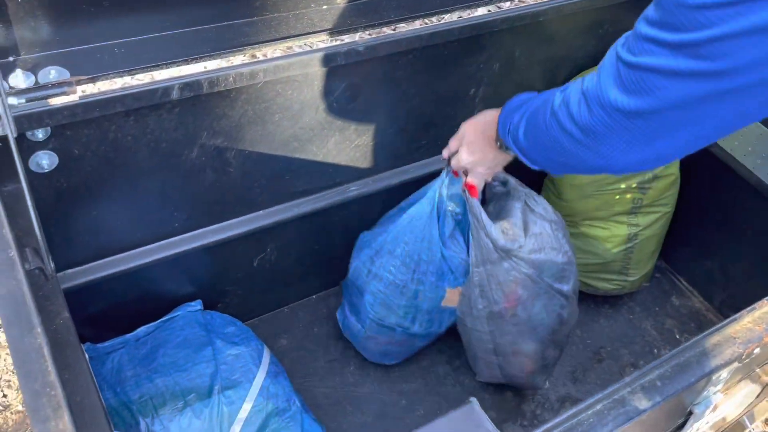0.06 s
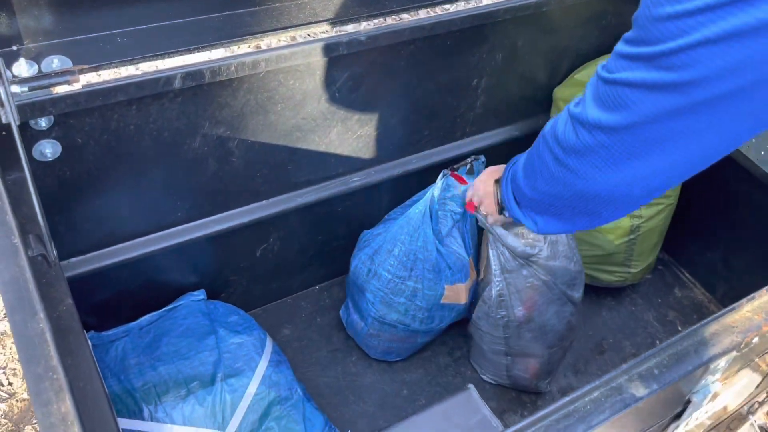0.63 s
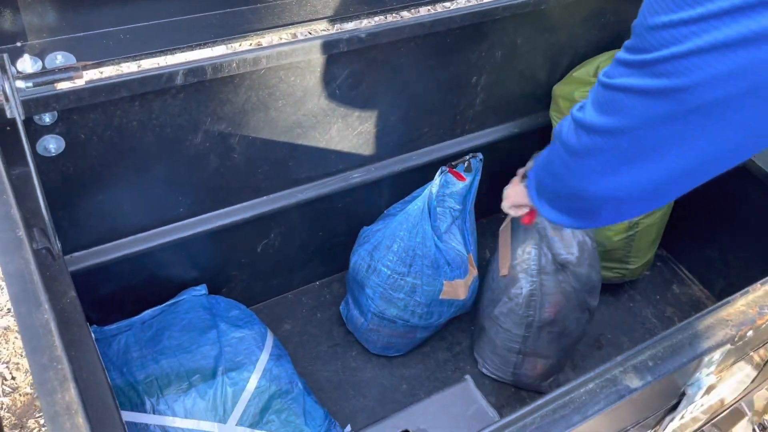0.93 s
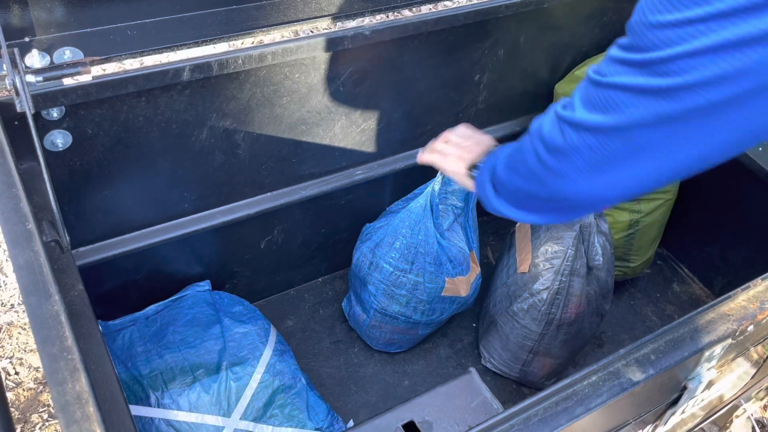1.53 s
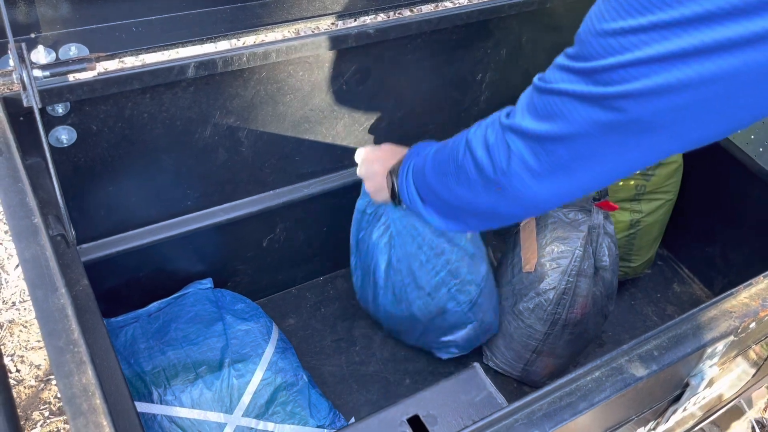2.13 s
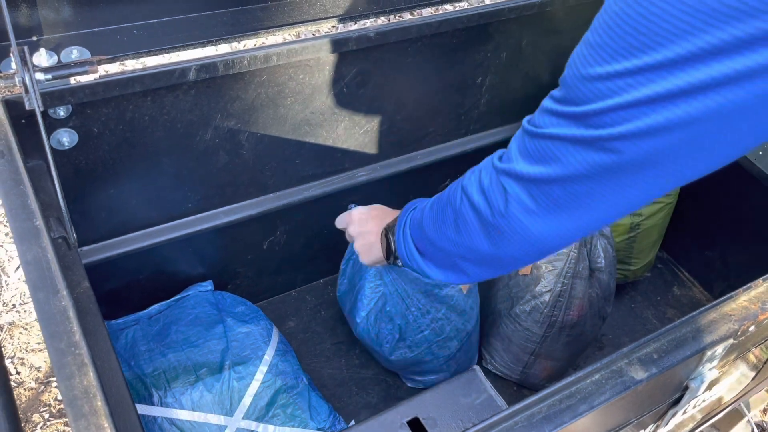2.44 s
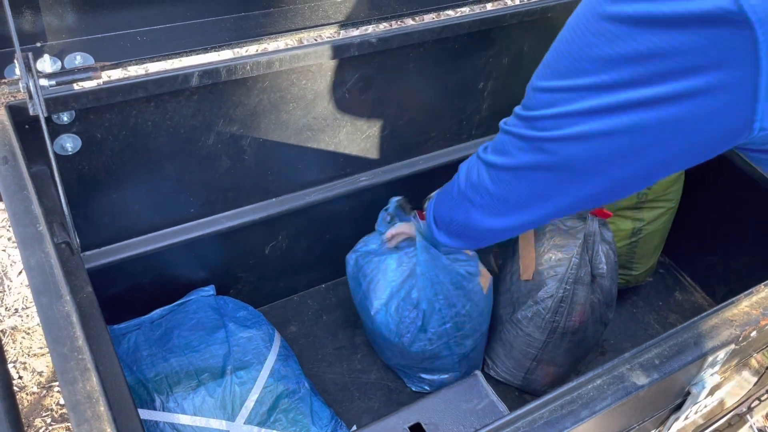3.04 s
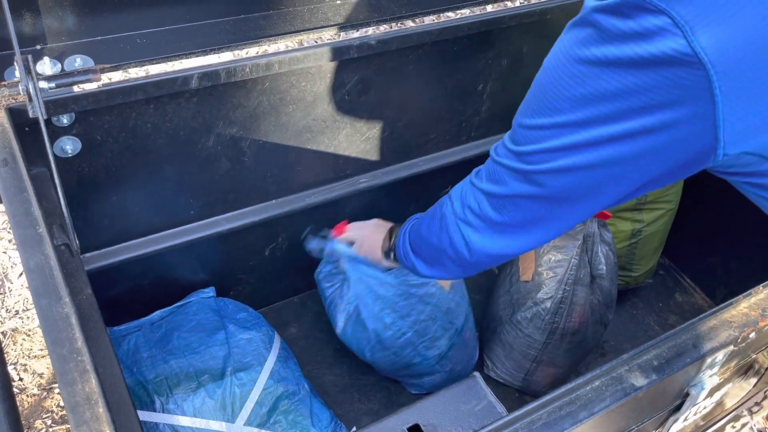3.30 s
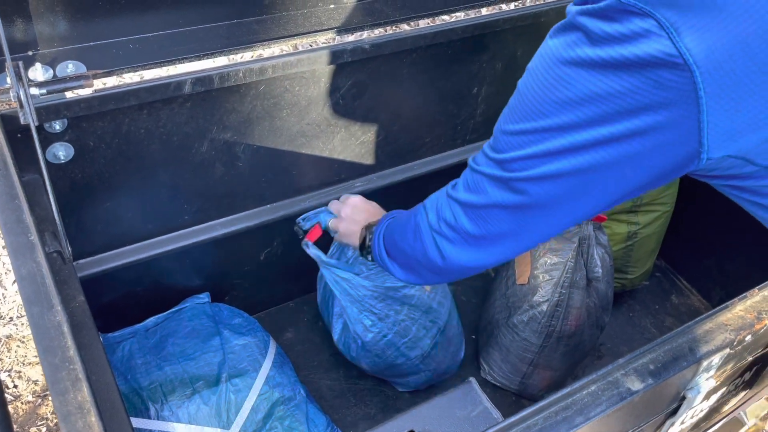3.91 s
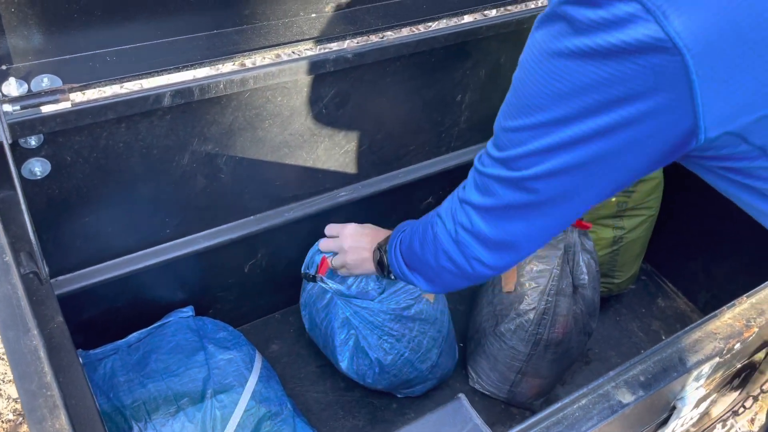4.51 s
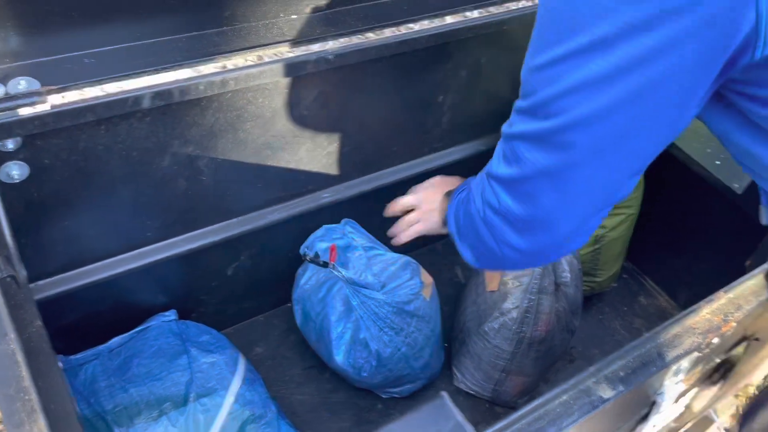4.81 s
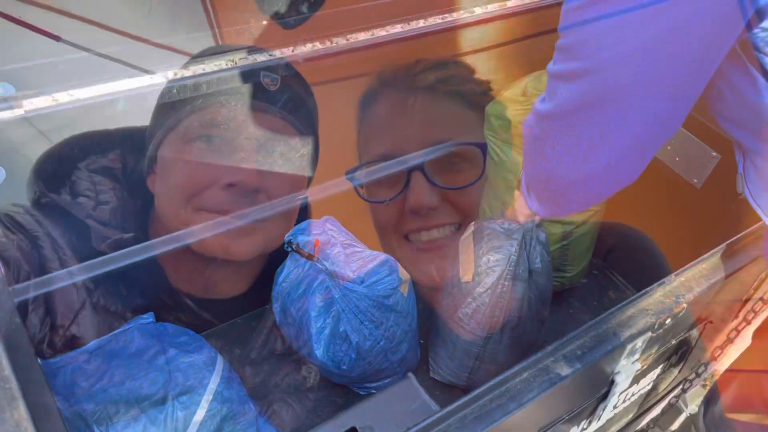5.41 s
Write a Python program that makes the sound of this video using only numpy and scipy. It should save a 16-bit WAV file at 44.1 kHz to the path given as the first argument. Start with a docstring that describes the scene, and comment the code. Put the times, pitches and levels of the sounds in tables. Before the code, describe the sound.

A brief nylon rustle opens, and at about 0.1 seconds stuffed bags land in a steel storage box with a heavy thump. The panels ring low and fade within a second as the load settles. Uneven crinkling follows, with snapping creases, short scrapes and small ticks from the contents, easing off around 1.3 seconds. The rustling picks up near 1.7 seconds and surges at 2.1 as a bag is dragged. Around 3 seconds comes a louder cluster of crackles and muffled knocks. From 3.3 to 3.9 seconds the load bumps and slips on the floor, stirring the panels again, with more bumps and a scrape near 4.4. A soft thud lands at about 5 seconds, then a few light rustles continue until 5.5. Everything is close and in stereo, with tight reflections from the box and faint, low outdoor air underneath.

```python
"""A brief nylon rustle, then a heavy thump: stuffed bags land in a steel storage box and its panels ring.
The bags are shuffled about. Folds buckle and crinkle, creases snap, contents rub and tick, and the load
sticks, slips and bumps on the floor, stirring the panels again. Faint campsite air lies underneath.
A close pair of microphone ports hears it all with the box's reflections."""
import sys
import numpy as np
from scipy import signal
from scipy.fft import rfft, irfft, next_fast_len
from scipy.io import wavfile

SR = 44100
rng = np.random.default_rng(int(sys.argv[2]) if len(sys.argv) > 2 else 0)


def unload_wav(signal):
    """Save mono or channel-first audio to the path in sys.argv[1] as 16-bit WAV at rate SR, clipped to [-1, 1]."""
    wavfile.write(
        sys.argv[1],
        SR,
        np.round(np.clip(np.atleast_2d(signal).T, -1, 1) * 32767).astype(np.int16),
    )


N = 244755
TIME = np.arange(N) / SR

# pulls and pushes of the bags: (start [s], length [s], crinkle [dB], swell over the move [dB],
# sheen [dB re crinkle], rub [dB re crinkle], drag drive [dB re crinkle])
MOVES = [(-0.03, 0.14, -54, -3.5, 2, 5.5, 10), (0.078, 0.054, -34.5, 3.5, -4.5, -2, 18),
         (0.134, 0.071, -54, 4.5, -7, 8, 10), (0.202, 0.26, -50, -2.5, -2.5, 8, 0),
         (0.497, 0.15, -52, -2.5, -9, 6, 14), (0.627, 0.25, -54, 3.5, -3.5, 1, 7),
         (0.922, 0.1, -42, -6.5, -6, -0.5, 6.5), (1.028, 0.1, -50.5, -1, -7.5, -1.5, -2),
         (1.158, 0.28, -56.5, -4, -12, -5, -11), (1.576, 0.084, -49, -1.5, 0, -3.5, -3),
         (1.67, 0.15, -44.5, -2.5, -7, 0, 4.5), (1.869, 0.11, -59, 0, -2, -2, 12.5),
         (1.999, 0.092, -45, -1, -0.5, -3.5, -12), (2.105, 0.052, -33.5, -4.5, 3, -0.5, -13),
         (2.151, 0.22, -40.5, -4, -3.5, 2, 11), (2.411, 0.48, -54.5, -5, -4.5, 1.5, 7),
         (2.703, 0.2, -48.5, -5.5, 1, -0.5, 11.5), (2.889, 0.042, -34.5, -4.5, -2, -4.5, 3),
         (2.949, 0.083, -37.5, 4, -9.5, 1, -6), (3.035, 0.24, -41.5, 0.5, -8, -1, -20),
         (3.294, 0.098, -36, -11.5, -5, 4, 12), (3.387, 0.065, -46, 6.5, -2.5, -1.5, -4),
         (3.466, 0.14, -46, 2.5, -13, 0.5, 1), (3.607, 0.19, -39, -7.5, -10.5, 1, -1),
         (3.748, 0.2, -44, 3.5, -3, 1.5, 6.5), (3.951, 0.063, -54, 7.5, -9, 4, 13),
         (4.072, 0.16, -51, 2.5, -9, -0.5, 1.5), (4.293, 0.048, -58, 18, -3, -9, -20),
         (4.345, 0.041, -39, 5, -11.5, 0, -4), (4.41, 0.15, -52.5, 0, -10.5, 5.5, 10),
         (4.552, 0.096, -53, 6, -2.5, -18, 5), (4.733, 0.16, -73, 12.5, -14, 2, 16),
         (4.954, 0.079, -56.5, 1.5, 2, -1.5, 4), (5.272, 0.039, -54.5, 4, -6.5, -6.5, 10),
         (5.345, 0.11, -54.5, 4.5, -10, 1.5, -7)]
# spectral shapes: (frequency [Hz], relative density [dB])
AIR_SPECTRUM = [(20, 14), (70, 16), (170, 4.5), (300, -13), (480, 6.5), (700, -21), (1500, -15),
                (4000, -40), (15000, -40)]
CRINKLE_SPECTRUM = [(300, -13), (900, 1), (1300, 0.5), (1900, 2.5), (2300, -2), (3100, 1.95), (4400, -0.5),
                    (5300, -6.5), (7500, -9), (10000, -16), (15000, -19)]
SHEEN_SPECTRUM = [(2000, -32), (5000, -2), (8000, -1), (10500, 0.5), (12500, -5), (13800, -13.5),
                  (15500, -26)]
RUB_SPECTRUM = [(100, -9), (220, 0.5), (400, -1), (520, -1), (620, -13), (950, -7.5), (1300, -9),
                (2200, -21.5), (5000, -54.5)]
RUMBLE_SPECTRUM = [(20, -38), (42, 9), (65, 0.5), (85, 5), (110, -3), (135, -0.5), (180, 3), (230, -6.5),
                   (350, -14), (800, -59.5)]
SNAP_SPECTRUM = [(150, -31), (500, 0), (1800, 8), (2400, 3), (3500, 6.5), (7000, 6), (12000, 9.5),
                 (16000, 7)]
# steel panel modes: (frequency [Hz], gain [dB], T60 [s])
PANEL_MODES = [(46.3, -29, 0.4), (80.2, -8, 1.35), (95, -14.5, 1.5), (108.9, -3.5, 0.73), (168.6, -18, 1.1),
               (188.2, -7.5, 0.86), (254, -13.5, 1.1), (274.7, -15, 1.4), (335, -11.5, 0.8),
               (376, -20, 0.55), (407.3, -6.5, 0.54), (436.5, -11.5, 0.67), (469, -7, 0.33),
               (517, -9, 0.53), (609, -22, 1.6), (676, -19, 0.47), (920, -12, 0.24)]
# fabric and contents catching on steel: (start [s], end [s], pitch [Hz], width [Hz], mid-scrape level [dB])
SCRAPES = [(0.079, 0.121, 380, 316, -27), (0.526, 0.772, 2680, 115, -56), (0.922, 0.992, 2630, 395, -48),
           (0.915, 1.05, 502, 200, -47), (1.35, 1.6, 427, 147, -54), (1.673, 1.862, 388, 260, -50),
           (2.11, 2.31, 480, 380, -45), (2.117, 2.268, 1040, 600, -47), (2.918, 3.101, 375, 259, -38.5),
           (3.441, 3.453, 685, 160, -35.5), (3.79, 3.949, 407, 260, -43.5), (4.102, 4.142, 1860, 704, -43),
           (4.383, 4.426, 1340, 920, -36), (4.63, 4.656, 337, 118, -44.5)]
# crease snaps and knocks inside the bags: (time [s], peak [dB], brightness [dB])
SNAPS = [(0.082, -20.5, -22), (0.19, -27, -11), (0.284, -30.5, -14), (0.433, -31.5, -9), (0.52, -33, -15),
         (0.565, -34, -6), (0.618, -29, -6), (0.691, -29.5, -16), (0.706, -30, -9), (0.817, -27, -11),
         (0.922, -32.5, -10), (1.204, -32.5, -14.5), (1.361, -36, -11), (1.816, -36, -22),
         (1.829, -28, -21.5), (2.022, -26, -14), (2.116, -27, -3), (2.36, -21.5, -11), (2.463, -29.5, -10),
         (2.573, -36.5, -13), (2.641, -34.5, -36), (2.665, -29.5, -11), (2.717, -27.5, -12),
         (2.774, -22, -2), (2.827, -28.5, 0), (2.945, -26.5, -26), (2.979, -18.5, -20), (3.000, -17, -17),
         (3.018, -17, -11), (3.076, -25.5, -20), (3.119, -27, -23), (3.426, -27, -15), (3.468, -22.5, 0),
         (4.017, -34, -16), (4.209, -30.5, -20), (4.424, -25.5, -21), (4.735, -44, -2), (4.825, -43.5, -10),
         (5.241, -42.5, -15), (5.468, -36.5, -16)]
# landings on the floor, plus two soft dull thuds at 0.403 s and 4.954 s: (time [s], thud drive [dB], contact
# [s], panel push [dB])
BUMPS = [(0.083, -9.5, 0.0035, -22), (0.126, -6.5, 0.0079, -21), (0.191, -16.5, 0.012, -32),
         (0.217, -32, 0.0026, -34), (0.283, -27, 0.0042, -42), (0.320, -21, 0.011, -36),
         (0.354, -14.5, 0.018, -44), (0.403, -15.5, 0.015, -43), (1.158, -38.5, 0.012, -59),
         (1.682, -52, 0.0064, -38), (2.115, -35, 0.0024, -54), (2.236, -43, 0.0037, -47),
         (3.324, -29, 0.0025, -37.5), (3.337, -23.5, 0.0044, -39), (3.381, -25.5, 0.0056, -34.5),
         (3.421, -24.5, 0.0098, -48), (3.458, -28, 0.0096, -40), (3.555, -31, 0.0063, -51),
         (3.629, -32, 0.0015, -38.5), (3.823, -22, 0.013, -42), (3.85, -29, 0.0036, -43.5),
         (4.012, -35, 0.0079, -45), (4.209, -31.5, 0.00087, -63), (4.342, -28.5, 0.0054, -43),
         (4.367, -29, 0.003, -41), (4.383, -25, 0.0026, -33.5), (4.434, -26.5, 0.0054, -36.5),
         (4.795, -39.5, 0.0011, -57), (4.954, -19.5, 0.016, -39)]
# floor resonances, damped by the load: (frequency [Hz], width [Hz], gain [dB])
FLOOR_MODES = [(81, 2.3, 2.5), (110.5, 8.9, 12), (183, 20.4, 9), (400, 80, 6.5)]
# small hard contents touching: (time [s], peak [dB], pitch [Hz])
TICKS = [(0.939, -30.5, 2680), (1.003, -40, 3830), (1.021, -35.5, 3140), (1.272, -38, 1280),
         (1.396, -36.5, 3000), (1.951, -39, 1660), (2.324, -28, 1410), (3.12, -26, 2660),
         (3.161, -23, 1600), (4.108, -34.5, 1600), (4.21, -25.5, 830)]
# microphone ports: (frequency [Hz], direct share of power [0-1], left minus right [dB])
PORTS = [(60, 0.96, 1.5), (245, 0.98, -0.5), (710, 0.81, 3), (1480, 0.75, 2), (2450, 0.62, -0.5),
         (3650, 0.46, 2.5), (5400, 0.67, 2), (6970, 1, 1), (8400, 1, -3), (10500, 0.8, 1), (14900, 1, -1)]
# sound bending round the housing reaches one port first: (frequency [Hz], left lead [rad])
PORT_LEAD = [(1600, 0), (2300, .7), (3100, 1.1), (3700, -.7), (4800, .3), (6400, -.6), (8200, -3.14),
             (9800, -4.7), (11000, -6.28), (12500, -6.4), (14000, -9.42)]

# a bag's skin answers at once; contents and weight lag
SKIN = dict(attack_s=0.013, release_db_per_s=300, rest_db=-72.5)
SHEEN = dict(attack_s=0.019, release_db_per_s=277, rest_db=-80)
CONTENTS = dict(attack_s=0.02, release_db_per_s=166, rest_db=-68)
WEIGHT = dict(attack_s=0.071, release_db_per_s=144, rest_db=-52)


def from_db(db):
    """Decibels to gain."""
    return 10 ** (np.asarray(db) / 20)


def unit_rms(x):
    """Scale to rms 1."""
    return x / np.sqrt(np.mean(x ** 2) + 1e-20)


def highpass(x, hz):
    """Second-order low cut."""
    return signal.sosfilt(signal.butter(2, hz, "high", fs=SR, output="sos"), x)


def at_hz(rows, hz):
    """Table columns interpolated over log frequency."""
    points, *columns = np.transpose(rows)
    return [np.interp(np.log(hz + 1), np.log(points), c) for c in columns]


def drift(turns_per_s):
    """Ramps between standard normal draws."""
    knots = rng.standard_normal(N // 10)
    return np.interp(TIME * turns_per_s, np.arange(len(knots)), knots)


def colour(x, spectrum, size=8192):
    """Minimum-phase filter of unit energy."""
    level_db, = at_hz(spectrum, np.fft.rfftfreq(size, 1 / SR))
    cepstrum = irfft(np.log(from_db(level_db)))
    cepstrum[1:size // 2] *= 2
    cepstrum[size // 2 + 1:] = 0
    response = irfft(np.exp(rfft(cepstrum)))
    return signal.fftconvolve(x, response / np.linalg.norm(response))[:N]


def resonance(x, hz, width_hz):
    """Two-pole band-pass, peak gain about 1."""
    r = np.exp(-np.pi * width_hz / SR)
    return signal.lfilter([1 - r, 0, r - 1], [1, -2 * r * np.cos(2 * np.pi * hz / SR), r * r], x)


def decay(x, t60_s):
    """Give each input sample an exponential tail."""
    return signal.lfilter([1], [1, -from_db(-60 / (t60_s * SR))], x)


def dying_noise(t60_s):
    """Dense decaying response: 1 s, unit energy."""
    tail = rng.standard_normal(SR) * from_db(-60 * TIME[:SR] / t60_s)
    return tail / np.linalg.norm(tail)


def grains(per_s, spread_db, clump_db, clumps_per_s):
    """Tiny slips and buckles of uneven size, in clumps; rms 1."""
    sizes = from_db(spread_db * np.minimum(rng.exponential(1, N), 4)) * rng.choice([-1, 1], N)
    hits = rng.random(N) < per_s / SR
    return unit_rms(sizes * hits * from_db(clump_db * drift(clumps_per_s)))


def effort(levels_db, attack_s, release_db_per_s, rest_db):
    """Gain over time: moves set in, swell or ease, then die back to a faint creep; powers add."""
    power = np.full(N, from_db(rest_db) ** 2)
    for (start_s, length_s, _, swell_db, *_), level_db in zip(MOVES, levels_db):
        span = slice(max(round(start_s * SR), 0), round((start_s + length_s + 0.5) * SR))
        age_s = TIME[span] - start_s
        onset = np.clip(age_s / (attack_s + 0.031 * length_s), 0, 1)   # longer moves start more gently
        shape_db = swell_db * np.minimum(age_s / length_s, 1)
        shape_db -= release_db_per_s * np.maximum(age_s - length_s, 0)
        power[span] += (onset * from_db(level_db + shape_db)) ** 2
    return np.sqrt(power)


def campsite_air(level_db=-54.5):
    """Steady outdoor noise, mostly bass."""
    return from_db(level_db) * colour(rng.standard_normal(N), AIR_SPECTRUM)


def buckling(per_s, t60_s, depth):
    """Folds give way at random, each a short surge in gain; rms 1."""
    folds = (rng.random(N) < per_s / SR) * np.minimum(rng.exponential(1, N), 3)
    return unit_rms(1 + depth * decay(folds, t60_s))


def fold_colours(x, spread_db=3, folds_per_s=55):
    """Each fold favours its own pitches: bands swell and sink independently."""
    out, rest = np.zeros(N), x
    for edge_hz in np.geomspace(900, 6500, 6):
        band = signal.sosfiltfilt(signal.butter(2, edge_hz, fs=SR, output="sos"), rest)
        out += band * unit_rms(from_db(spread_db * drift(folds_per_s)))
        rest = rest - band
    return out + rest


def fabric():
    """Nylon crinkles as it folds and hisses as it slides; contents rub dully over the floor."""
    _, _, crinkle_db, _, sheen_db, rub_db, _ = np.transpose(MOVES)
    folding = effort(crinkle_db, **SKIN)
    sliding = effort(crinkle_db + sheen_db, **SHEEN)
    shifting = effort(crinkle_db + rub_db, **CONTENTS)
    surge = buckling(per_s=140, t60_s=0.024, depth=0.36)
    buckles = surge * folding * grains(per_s=3000, spread_db=2, clump_db=1.5, clumps_per_s=200)
    slips = surge * sliding * grains(per_s=12000, spread_db=1, clump_db=1.5, clumps_per_s=86)
    rubs = shifting * grains(per_s=2500, spread_db=3, clump_db=2, clumps_per_s=77)
    crinkle = fold_colours(colour(buckles, CRINKLE_SPECTRUM))
    return crinkle + colour(slips, SHEEN_SPECTRUM) + colour(rubs, RUB_SPECTRUM)


def dragging(rumble_db=-7, panels_db=-46.5, settle_db=-2, settle_db_per_s=55):
    """Bags stick and slip as they move or settle after landing; the floor rumbles, the panels stir."""
    weight_db = [crinkle_db + drag_db for _, _, crinkle_db, *_, drag_db in MOVES]
    power = effort(weight_db, **WEIGHT) ** 2
    for time_s, _, _, push_db in BUMPS:
        span = slice(round(time_s * SR), round((time_s + 1) * SR))
        power[span] += from_db(push_db + settle_db - settle_db_per_s * (TIME[span] - time_s)) ** 2
    slips = np.sqrt(power) * grains(per_s=1500, spread_db=1.5, clump_db=-1, clumps_per_s=16)
    return from_db(rumble_db) * colour(slips, RUMBLE_SPECTRUM) + from_db(panels_db) * panels(slips)


def panels(force, detune_share=0.02, detunes_per_s=28):
    """Steel panels ring in their modes, detuned by the shifting load."""
    out = np.zeros(N)
    warp_s = np.cumsum(detune_share * drift(detunes_per_s)) / SR
    for k, (hz, gain_db, t60_s) in enumerate(PANEL_MODES):
        phasor = np.exp(2j * np.pi * hz * (TIME + (-1) ** k * warp_s))   # neighbours bend opposite ways
        amplitude = decay(force * phasor.conj() + 1e-18, t60_s)
        out += from_db(gain_db) * (amplitude * phasor).imag
    return out


def scrapes():
    """Quick stick-slip on steel: a short rasp around one pitch."""
    out = np.zeros(N)
    for start_s, end_s, hz, width_hz, level_db in SCRAPES:
        span = slice(round(start_s * SR), round(end_s * SR))
        rasp = resonance(resonance(rng.standard_normal(SR), hz, width_hz), hz, width_hz)
        rasp = unit_rms(rasp[-len(out[span]):])
        out[span] += from_db(level_db) * rasp * np.sin(np.linspace(0, np.pi, len(rasp)))
    return out


def snaps(crackle_t60_s=0.057, crack_t60_s=0.0096, crack_db=-1.5):
    """A crease flips: sharp crack, brief crackle. Knocks muffled inside a bag are duller."""
    out, age_s = np.zeros(N), TIME[:SR // 14]
    crackle = colour(grains(per_s=20000, spread_db=2, clump_db=4.5, clumps_per_s=850), SNAP_SPECTRUM)
    envelope = from_db(-60 * age_s / crackle_t60_s) + from_db(crack_db - 60 * age_s / crack_t60_s)
    for time_s, peak_db, brightness_db in SNAPS:
        at = round(time_s * SR)
        top_hz = np.clip(18000 * from_db(0.64 * brightness_db), 1500, 18000)
        muffle = signal.butter(2, [top_hz / 14, top_hz], "band", fs=SR, output="sos")
        burst = signal.sosfilt(muffle, crackle[at:at + len(age_s)] * envelope)
        out[at:at + len(age_s)] += from_db(peak_db) * burst / np.abs(burst).max()
    return out


def bumps(thud_gain_db=-3.5, wash_gain_db=30, wash_from_hz=430, wash_t60_s=0.77):
    """A soft load hits the floor: thud, short boom, ringing panels and a wash of crowded higher modes."""
    force, thud = np.zeros((2, N))
    for time_s, thud_db, contact_s, push_db in BUMPS:
        push = np.sin(np.pi * np.clip((TIME - time_s) / contact_s, 0, 1)) ** 2
        force += from_db(push_db) * push / push.sum()
        thud += from_db(thud_db) * push
    thud = highpass(thud + 1e-18, hz=45)
    boom = sum(from_db(gain_db) * resonance(thud, hz, width_hz) for hz, width_hz, gain_db in FLOOR_MODES)
    wash = signal.fftconvolve(force, dying_noise(wash_t60_s))[:N]
    wash = highpass(colour(wash, RUB_SPECTRUM), wash_from_hz)
    return panels(force) + boom + from_db(thud_gain_db) * thud + from_db(wash_gain_db) * wash


def ticks(t60_s=0.013, width_share=0.34, strays_per_s=34, low_hz=856, high_hz=5260):
    """Hard bits rattle for an instant around one pitch; random strays follow the crinkle's level."""
    out, age_s = np.zeros(N), TIME[:SR // 20]
    folding = effort([crinkle_db for _, _, crinkle_db, *_ in MOVES], **SKIN)
    rattle = rng.standard_normal(N)
    stray_starts = np.flatnonzero(rng.random(N)[:-len(age_s)] < strays_per_s / SR)
    stray_hz = low_hz * (high_hz / low_hz) ** rng.random(N)
    stray_peak = folding * from_db(6.5 - rng.uniform(-0.55, 0.5, N))
    clear = [(round(time_s * SR), from_db(peak_db), hz) for time_s, peak_db, hz in TICKS]
    strays = [(at, stray_peak[at], stray_hz[at]) for at in stray_starts]
    envelope = from_db(-60 * age_s / t60_s)
    for at, peak, hz in clear + strays:
        tick = resonance(rattle[at:at + len(age_s)] * envelope, hz, width_share * hz)
        out[at:at + len(age_s)] += peak * tick / np.abs(tick).max()
    return out


def ports(x, box_t60_s=0.027, shifts_per_s=12, patterns=6):
    """Each port gets the direct sound, out of step in the treble, and its own wall reflections."""
    size = next_fast_len(N + SR)
    hz = np.fft.rfftfreq(size, 1 / SR)
    direct_share, balance_db = at_hz(PORTS, hz)
    direct_share = np.clip(direct_share, 0, 0.999)
    lead_rad, = at_hz(PORT_LEAD, hz)
    # the sound shifts from fold to fold, each with its own reflection pattern
    weights = np.array([drift(shifts_per_s) for _ in range(patterns)])
    folds = rfft(x * weights / np.linalg.norm(weights, axis=0), size)
    spectrum, out = rfft(x, size), []
    for side in (1, -1):   # left, right
        direct = np.exp(0.5j * side * lead_rad) * spectrum
        walls = sum(fold * rfft(dying_noise(box_t60_s), size) for fold in folds)
        heard = np.sqrt(direct_share) * direct + np.sqrt(1 - direct_share) * walls
        out.append(irfft(heard * from_db(side * balance_db / 2), size)[:N])
    return np.array(out)


def scene():
    """Bags in the open box over faint campsite air, in stereo."""
    creases = snaps()
    bags = fabric() + dragging() + bumps() + scrapes() + creases + ticks()
    return ports(bags + campsite_air())


def record(dry):
    """The microphone drops the deepest bass; steep cut above 15.7 kHz."""
    top_cut = signal.ellip(10, 0.2, 80, 15700, fs=SR, output="sos")
    return signal.sosfilt(top_cut, highpass(dry, hz=55.3))


dry = scene()
out = record(dry)
unload_wav(out)
```